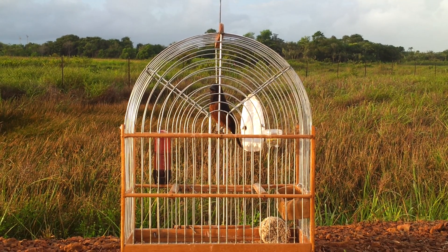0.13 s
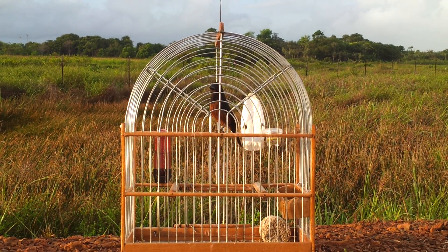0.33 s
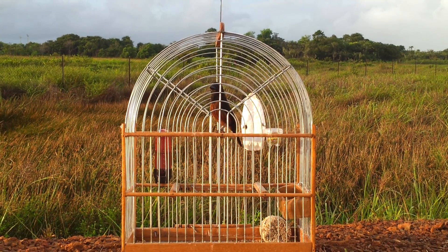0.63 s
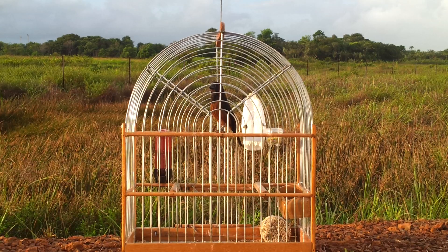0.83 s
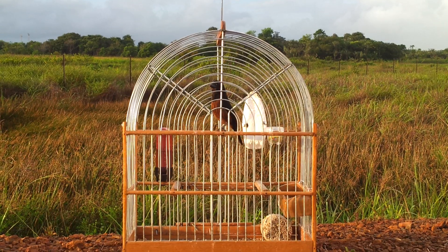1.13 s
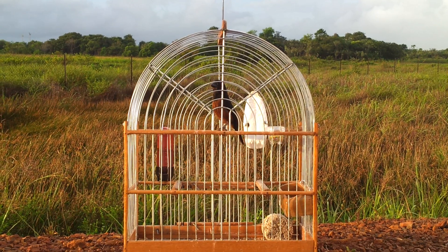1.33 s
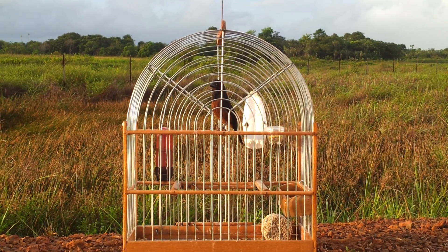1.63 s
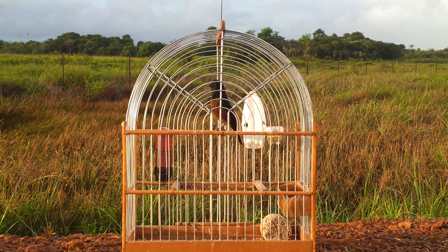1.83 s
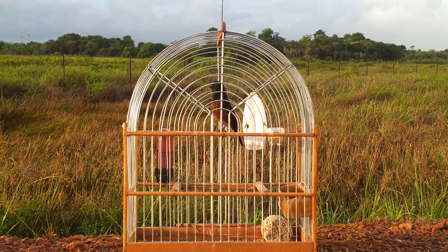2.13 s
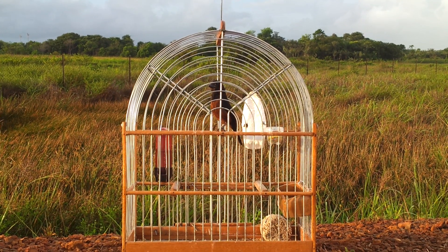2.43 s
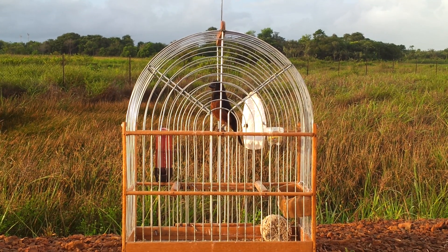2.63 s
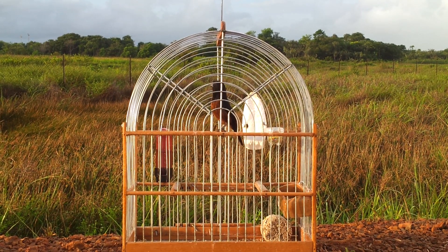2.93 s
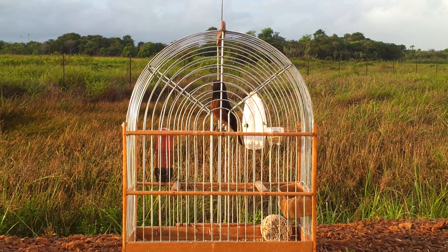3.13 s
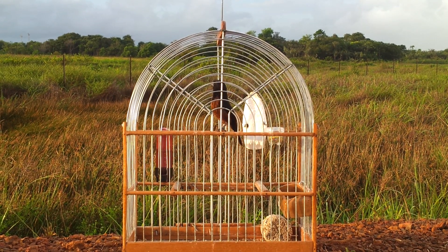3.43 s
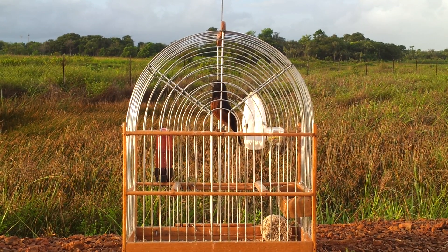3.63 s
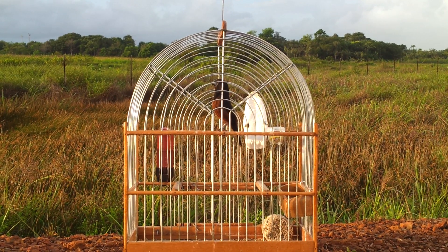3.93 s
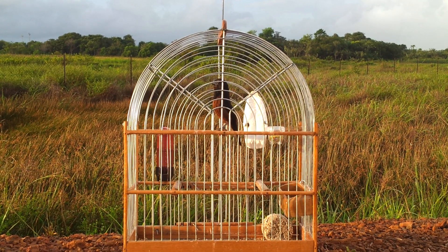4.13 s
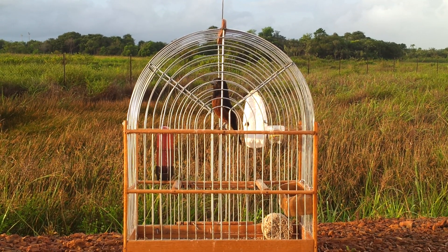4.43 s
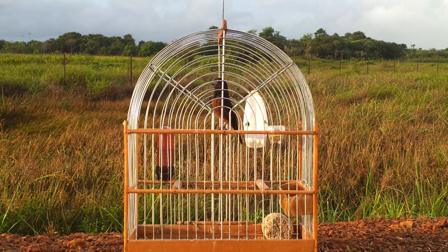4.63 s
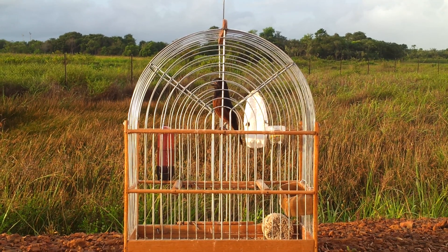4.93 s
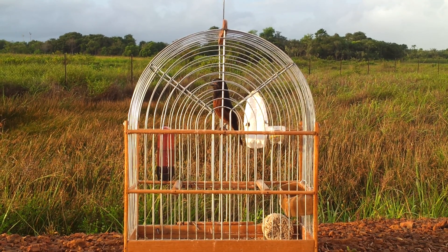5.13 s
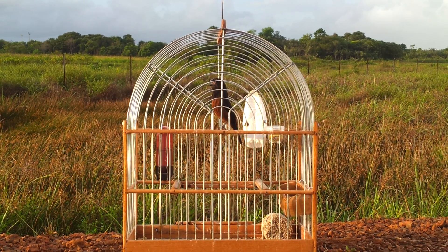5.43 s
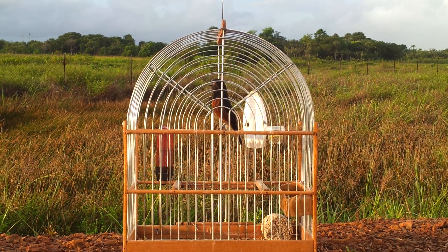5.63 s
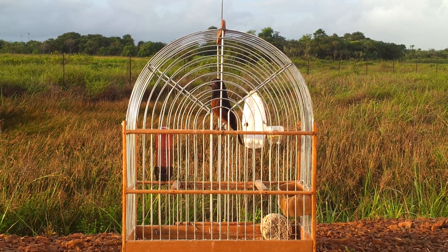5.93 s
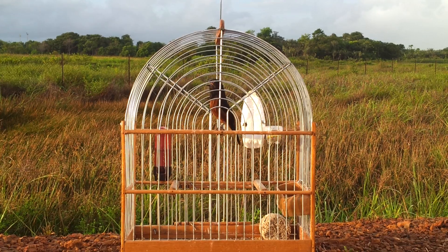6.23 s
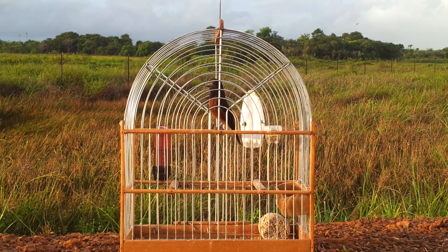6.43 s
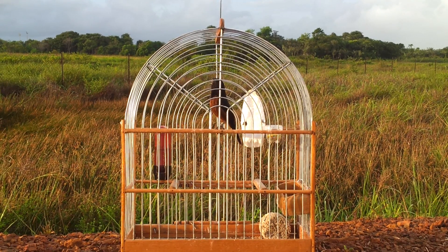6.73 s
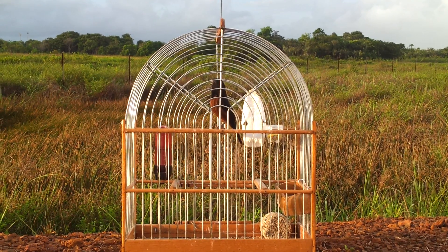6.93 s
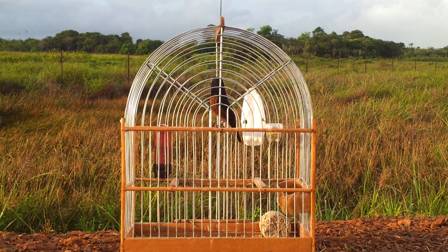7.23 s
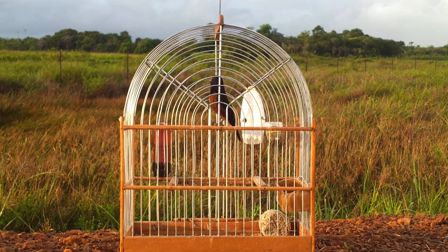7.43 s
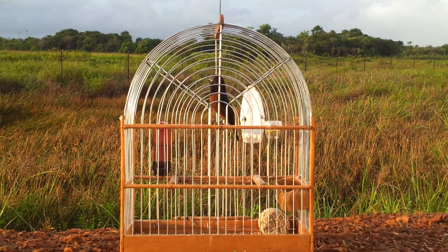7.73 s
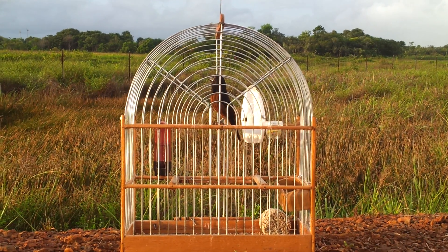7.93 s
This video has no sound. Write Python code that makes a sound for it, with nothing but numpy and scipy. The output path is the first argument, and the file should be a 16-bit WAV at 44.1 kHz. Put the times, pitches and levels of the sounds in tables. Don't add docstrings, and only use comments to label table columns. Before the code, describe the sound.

A small caged songbird, close and dry outdoors, with only slight reflections from cage and ground. First just quiet insects, faint land hum and tiny far chirps. Then bright, pure whistles bend up and down in quick phrases, swelling steadily; a fast rising trill and tight buzz lead to two sharp downward sweeps, the loudest moment, followed by a gentler trill and a few winding whistles.

```python
import sys
import numpy as np
from scipy import signal
from scipy.fft import rfft, irfft, next_fast_len
from scipy.io import wavfile
from scipy.ndimage import uniform_filter1d

SR = 44100
rng = np.random.default_rng(int(sys.argv[2]) if len(sys.argv) > 2 else 0)


def volts_from_decibels(level):
    exponent = np.asarray(level, float) / 20
    return 10 ** exponent


def wav_out(sig):
    wavfile.write(sys.argv[1], SR, np.round(np.clip(np.atleast_2d(sig).T, -1, 1) * 32767).astype(np.int16))


N = 356769
T = np.arange(N) / SR


def walk(rate_hz):
    hold = int(SR / rate_hz)
    steps = np.repeat(rng.standard_normal(N // hold + 1), hold)
    return 1.3 * uniform_filter1d(uniform_filter1d(steps, hold), hold)[:N]


def band(x, hz, width_hz, order=2):
    edges = [hz - width_hz / 2, hz + width_hz / 2]
    return signal.sosfilt(signal.butter(order, edges, "band", fs=SR, output="sos"), x)


def level(x, db):
    return x * volts_from_decibels(db) / np.sqrt(np.mean(x ** 2))


def lookup(table, hz):
    table_hz, table_db = np.array(table).T
    return np.interp(np.log(hz), np.log(table_hz), table_db)


def echoes(x, delay_ms, gain):
    lead, taps = 16, np.arange(-16, 360)
    off = taps - np.array(delay_ms)[:, None] * SR / 1000
    window = np.cos(np.pi / 2 * np.clip(off / lead, -1, 1)) ** 2
    response = np.array(gain) @ (np.sinc(off) * window)
    return signal.oaconvolve(x, response)[lead:lead + N]


def slides(table, blunt, late, early, loose=1):
    out = np.zeros(N)
    for (s, length, first, middle, last, db), turn in zip(table, rng.random((len(table), 1))):
        u = np.arange(int(length * SR)) / (length * SR)
        bend = middle - (first + last) / 2
        hz = first + (last - first) * u + 4 * u * (1 - u) * bend
        swell = np.sin(np.pi * u ** (late if last > first else early)) ** blunt
        tone = np.sin(2 * np.pi * (np.cumsum(hz) / SR + loose * turn))
        out[int(s * SR):][:len(u)] += np.sqrt(2) * volts_from_decibels(db) * swell * tone
    return out


def straight(table):
    return [(s, length, first, (first + last) / 2, last, db) for s, length, first, last, db in table]


ECHO_MS = [
    [0, .363, 3.197, 4.036],
    [0, .159, .59, 1.315, 1.95, 3.832, 5.578, 7.506],
    [.136, 1.519, 2.041, 4.512],
]
ECHO_GAIN = [
    [0.93, -0.23, -0.13, 0.22],
    [0.25, 0.98, 0.28, -.36, 0.09, -0.21, -0.3, 0.12],
    [1, -0.43, -0.21, -0.18],
]


def finch():
    pair = trills()
    mixed = volts_from_decibels(-12.5) * band(pair ** 2, 6100, 3600)
    mixed = mixed + volts_from_decibels(17.5) * band(pair ** 3, 4880, 1300)
    pair = pair + buzz()
    song = whistles() + pair + mixed + smacks()
    song = song * (1 + volts_from_decibels(-29.5) * band(rng.standard_normal(N), 900, 1300, order=1))
    rasp = song * band(rng.standard_normal(N), 950, 900)
    song = song + volts_from_decibels(-30) * band(rasp, 4150, 900)

    near = echoes(song, ECHO_MS[0], ECHO_GAIN[0])
    mics = np.array([echoes(near, ms, gain) for ms, gain in zip(ECHO_MS[1:], ECHO_GAIN[1:])])

    air = rng.standard_normal((2, 2, N))
    hiss = volts_from_decibels(-22.5) * uniform_filter1d(abs(pair), 200) * band(air[0], 7000, 9000, order=5)
    shrill = abs(band(pair, 7100, 2400, order=4))
    hiss = hiss + volts_from_decibels(-10) * uniform_filter1d(shrill, 900) * band(air[1], 10000, 8500)
    hiss = hiss + volts_from_decibels(-33) * uniform_filter1d(abs(song), 2000) * band(air[1], 500, 700)

    t = T[:SR // 4]
    tail = rng.standard_normal((2, len(t))) * np.exp(-np.log(1000) * t / 0.26) * (t > .008)
    return mics + hiss + volts_from_decibels(-62) * signal.fftconvolve(song[None], tail, axes=1)[:, :N]


# t/s from start, f/Hz, level/dB under the loudest moment
OPENER = [(0, 4400, -19), (.012, 4050, -15), (.052, 3980, -14), (.08, 3290, -20), (.104, 3310, -12),
          (.144, 3620, 0), (.161, 3880, -11), (.174, 3230, -24), (.217, 3200, -28)]
ZIGZAG = [(0, 4090, -22.5), (.039, 3790, -20.5), (.056, 3693, 0), (.111, 3020, -20.5), (.127, 3780, -16.5),
          (.164, 3860, -21), (.176, 3716, -4), (.207, 3130, -14), (.217, 3220, -35)]
HOOK = [(0, 2100, -20), (.012, 1890, -17), (.033, 1670, -9), (.043, 1710, -11), (.054, 1920, -11),
        (.064, 2100, -5), (.093, 2140, -2), (.108, 1970, -13), (.119, 1220, -24)]
DIP = [(0, 3800, -26), (.032, 3790, -6.5), (.06, 3670, -2.2), (.095, 3380, -2.5), (.116, 3146, 0),
       (.138, 2720, -14), (.163, 2790, -15), (.185, 3220, -9), (.204, 3280, -2.8)]
WAVE = [(0, 3950, -24), (.024, 3810, -14), (.036, 3770, -3), (.052, 3720, -1.5), (.066, 3600, -10),
        (.082, 3340, -14), (.098, 3840, -12), (.122, 3720, -1.5)]
STAIR = [(0, 3990, -23), (.013, 4075, -6), (.03, 4325, -3), (.039, 3900, -14), (.058, 3090, -19.5),
         (.086, 3045, -11), (.112, 3140, -3), (.154, 3118, 0), (.164, 2930, -11)]
BUMP = [(0, 1300, -6), (.006, 1680, -7), (.011, 1933, -3), (.017, 1830, 0), (.021, 1520, -6),
        (.03, 1220, -12)]
GULP = [(0, 1300, -16), (.014, 1520, 0), (.022, 1470, -8), (.035, 1270, -14)]
PICKUP = [(0, 1500, -6), (.006, 1850, 0), (.027, 2040, -4)]
LIFT = [(0, 4450, -4), (.01, 4520, 0), (.024, 4680, -3), (.039, 5200, -5), (.046, 6300, -25)]
CATCH = [(0, 3790, -16), (.019, 3753, -2.2), (.036, 3693, 0), (.04, 3750, -24), (.047, 4484, -8.5),
         (.055, 3430, -16)]
SINK = [(0, 3667, -26.5), (.013, 3666, -8.5), (.038, 3555, 0), (.061, 3304, -4.5), (.074, 3186, -12.5),
        (.08, 3100, -23.5), (.089, 3083, -5), (.124, 2784, -6.5), (.145, 2560, -27)]
SOFT_HOOK = [(0, 2150, -9), (.012, 1980, -6), (.034, 1640, -6), (.046, 1740, -12), (.057, 2090, -6),
             (.095, 2135, -2), (.106, 2110, 0), (.113, 1800, -6), (.121, 1250, -19)]
LATE_STAIR = [(0, 3990, -20), (.012, 4075, -6), (.028, 4325, -2), (.039, 3900, -14), (.062, 3050, -20),
              (.086, 3045, -11), (.112, 3140, -3), (.158, 3118, -1), (.172, 2930, -9)]
FIRST = [(0, 4450, -24), (.009, 4180, -15), (.038, 4260, -17), (.075, 3420, -22), (.105, 3330, -12),
         (.145, 3760, -2), (.151, 3980, -10), (.16, 3360, -19), (.205, 3310, -19)]
LATE_DIP = [(0, 3680, -33), (.026, 3700, -19), (.054, 3750, -4), (.072, 3620, -3), (.118, 3210, 0),
            (.14, 2760, -11), (.16, 2650, -16), (.19, 3190, -12), (.212, 3280, -2)]
LATE_WAVE = [(0, 3900, -32), (.013, 3810, -14), (.034, 3750, -1), (.054, 3600, -2), (.07, 3400, -6),
             (.08, 3280, -8), (.086, 3450, -16), (.102, 3760, -3)]
# t/s from start, f/Hz, level/dB
FLICK = [(0, 3118, 0), (.003, 3260, 0), (.005, 3610, -9), (.009, 4000, -11), (.017, 3900, -32)]
DROOP = [(0, 3167, -1.2), (.007, 3140, -9), (.016, 3000, 0), (.034, 2880, -1.5), (.045, 2730, -5),
         (.053, 2400, -20)]
FOOT = [(0, 2280, -11), (.012, 2240, -2.5), (.05, 2365, 0), (.056, 2170, 0), (.062, 1780, -12),
        (.069, 1320, -15)]
ARCH_UP = [(0, 1270, -17.5), (.007, 1447, -8), (.026, 1583, -10.5), (.088, 1868, -7), (.145, 2150, 0),
           (.158, 2265, -4), (.178, 2430, -2.2)]
ARCH_DOWN = [(0, 2410, -3), (.011, 2264, -4.5), (.019, 2133, 0), (.042, 1924, -16), (.055, 1848, -6.5),
             (.093, 1728, -16.5), (.099, 1564, -11), (.107, 1190, -25)]
PLUNGE = [(0, 6800, -35), (.006, 5650, -29), (.011, 5050, -13.5), (.022, 4460, -6), (.031, 4270, .6),
          (.049, 3835, -10), (.063, 3680, -5), (.073, 3680, -52)]
CLIMB = [(0, 3160, -33), (.026, 3090, -7), (.038, 3110, -22), (.054, 3280, -13), (.067, 3452, -.4),
         (.083, 3680, -1.2), (.092, 3800, -24)]
# t/s, f/Hz, level/dB each
TIED = [FLICK, DROOP, FOOT, ARCH_UP, ARCH_DOWN, PLUNGE, CLIMB]
# gesture, t/s, time stretch/ratio, pitch factor/ratio, level/dB
VERSE = [(FIRST, 2.922, 1, 1, -32.5), (OPENER, 3.232, 1, 1, -24.5), (ZIGZAG, 3.54, 1, 1, -20),
         (SOFT_HOOK, 3.85, 1, 1, -28), (DIP, 4.016, 1, 1, -19), (FLICK, 4.287, .85, .98, -20.5),
         (WAVE, 4.381, 1, 1, -16.5), (FLICK, 4.601, 1.1, 1.01, -18), (STAIR, 4.698, .99, 1, -13),
         (FOOT, 4.885, 1, .99, -20.5), (LATE_STAIR, 5.02, 1, 1, -13), (FOOT, 5.21, 1.03, 1.005, -17),
         (BUMP, 5.343, 1, 1, -20), (ARCH_UP, 5.379, 1, 1, -17.5), (ARCH_DOWN, 5.566, 1, 1, -14)]
FINALE = [(GULP, 6.011, 1, 1, -25), (PICKUP, 6.375, 1, 1, -30), (BUMP, 6.401, .67, 1.81, -23),
          (LIFT, 6.427, 1, .99, -18.5), (PLUNGE, 6.474, 1.02, 1, -4), (LIFT, 6.584, .8, 1.04, -21),
          (PLUNGE, 6.622, .97, 1.003, -4), (CATCH, 6.972, 1, 1, -17), (CLIMB, 7.042, 1, 1, -9),
          (SINK, 7.188, 1, 1, -8.5), (HOOK, 7.42, 1, 1, -15.5), (LATE_DIP, 7.578, 1, 1, -10.3),
          (DROOP, 7.813, 1, 1, -16), (LATE_WAVE, 7.988, 1, 1, -18)]


def notes():
    out = []
    for shape, start, stretch, tune, db in VERSE + FINALE:
        rows = [(start + s * stretch, hz * tune, under_db + db) for s, hz, under_db in shape]
        if shape in TIED:
            out[-1] = out[-1] + rows
        else:
            out.append(rows)
    return out


# f/Hz, level/dB
THROAT = [(1200, -9), (2000, -1), (3200, -0.9), (4900, 4), (6000, -4.5), (7600, -2.3), (9500, -3.5),
          (11500, 7), (15000, -5.5)]
CHEST_DB = [-17.5, -0.4, -24, -35, -37, -48]
HEAD_DB = [3, -28, -35.5, -49.5, -68.5, -76.5]
# from f/Hz, to f/Hz
BREAK_HZ = (2350, 2750)
# boost of harmonics 3 and 4, level/dB
PRESS_DB = [
    [13],
    [27],
]


def whistles():
    out = np.zeros(N)
    for note in notes():
        s, hz, db = np.transpose(note)
        on = slice(int(s.min() * SR), min(int(s.max() * SR), N))
        t = T[on]
        hz = uniform_filter1d(np.interp(t, s, hz), 90)
        rich_db = 9 * np.clip(np.log2(2000 / hz), 0, 1)
        gains = []
        for k, pair_db in enumerate(zip(CHEST_DB, HEAD_DB), start=1):
            voice_db = np.interp(hz, BREAK_HZ, pair_db) + min(max(k - 2, 0), 2) * rich_db
            gains.append(volts_from_decibels(voice_db + lookup(THROAT, k * hz)))
        gains = np.array(gains)
        press_s = 6.025
        gains[2:4] *= volts_from_decibels(np.array(PRESS_DB) * (abs(t - press_s) < .03))
        gains[0] *= volts_from_decibels(1.4 * np.clip(-19.5 - db.max(), 0, 10) * (hz > 1550) * (hz < 2300))
        gains = gains / np.sqrt(np.sum(gains ** 2, axis=0))

        phase = 2 * np.pi * np.cumsum(hz) / SR
        tone = sum(g * (k * hz < .45 * SR) * np.sin(k * phase) for k, g in enumerate(gains, start=1))
        edge = np.clip(np.minimum(t - t[0], t[-1] - t) / 0.00052, 0, 1)
        loudness = volts_from_decibels(uniform_filter1d(np.interp(t, s, db), 90))
        out[on] += np.sqrt(2) * loudness * edge * tone
    return out


# t/s, length/s, first f/Hz, last f/Hz, level/dB
LOUD_TRILL = [(5.745, .021, 3600, 4400, -22), (5.759, .028, 3400, 4350, -15),
              (5.775, .041, 3150, 4300, -13), (5.8, .044, 3000, 4200, -13), (5.825, .051, 2950, 3980, -14),
              (5.857, .047, 2950, 3850, -15), (5.883, .047, 2950, 3700, -14)]
SOFT_TRILL = [(6.732, .027, 3500, 4200, -22), (6.749, .03, 3200, 4050, -18), (6.765, .037, 2900, 3950, -13),
              (6.787, .035, 2850, 3900, -18), (6.811, .041, 2850, 3760, -16),
              (6.836, .044, 2800, 3770, -16.5), (6.862, .04, 2850, 3450, -21)]
# t/s, length/s, first f/Hz, middle f/Hz, level/dB
RATTLE = [
    (6.174, .024, 4530, 3976, -9.5),
    (6.197, .03, 4460, 3674, -10.5),
    (6.221, .038, 4940, 3510, -13),
    (6.248, .039, 4695, 3380, -15.5),
    (6.276, .024, 4600, 3950, -24),
    (6.189, .014, 7600, 7000, -42),
]
# delay t/s, length/s, first f/Hz, middle f/Hz, last f/Hz, level/dB under the stair
SWOOP = (.025, .058, 6360, 4230, 3575, -15)
# t/s, length/s, first f/Hz, last f/Hz, level/dB
GRACES = [(5.738, .0072, 4900, 4280, -34), (5.918, .014, 3000, 2600, -27), (6.032, .016, 6500, 5900, -33),
          (6.05, .013, 6650, 6950, -25), (6.212, .019, 7350, 5850, -48), (6.89, .012, 2790, 2620, -29),
          (6.045, .016, 4200, 2800, -44), (6.377, .01, 3500, 5200, -33), (6.73, .006, 5000, 3700, -38),
          (5.018, .004, 4900, 4000, -38), (7.577, .004, 4700, 3800, -42), (7.987, .005, 4800, 3900, -42),
          (5.346, .008, 3400, 5200, -32), (5.361, .012, 5000, 3800, -34), (5.268, .012, 5300, 4300, -34)]
# t/s, half width/s, share shut/0-1
SHUTS = [(5.764, .002, .7), (5.789, .002, .4), (5.818, .002, .5), (5.851, .002, .3), (5.881, .002, .4),
         (5.898, .0015, .4), (6.762, .002, .3), (6.778, .002, .5), (6.801, .002, .8), (6.8235, .0022, .95),
         (6.852, .002, .95), (6.8795, .0025, 1)]


def trills():
    rising = []
    for table, bend in ((LOUD_TRILL, .1), (SOFT_TRILL, .19)):
        for s, length, first, last, db in table:
            middle = (first + last) / 2 + bend * (last - first)
            rising.append((s, length, first, middle, last, db))
    falling = [(s, length, first, middle, .77 * middle, db) for s, length, first, middle, db in RATTLE]
    delay, *path, under_db = SWOOP
    swoops = [(start + delay, *path, db + under_db)
              for shape, start, _, _, db in VERSE if shape in (STAIR, LATE_STAIR)]
    pipe = np.ones(N)
    for s, half, shut in SHUTS:
        pipe *= 1 - np.clip(shut, 0, 1) * np.exp(-((T - s) / half) ** 2)
    cut = pipe * slides(rising, blunt=.8, late=1.6, early=.7)
    return cut + slides(falling + swoops + straight(GRACES), blunt=.8, late=1.4, early=.7)


LOW_DB = [-36, -34, -32, -28, -26, -23, -19]
HIGH_DB = [-23, -23, -19, -22, -23, -28, -28]
# delay t/s, length/s, first f/Hz, middle f/Hz, last f/Hz
LOW_PATH = (.001, .021, 4400, 3500, 2500)
HIGH_PATH = (.004, .017, 8400, 6950, 5500)


def buzz():
    start_s, gap_s, drag_s = 6.0605, 678 / SR, .0012
    k = np.arange(len(LOW_DB))
    starts = start_s + gap_s * k + drag_s * np.maximum(k - 4, 0)
    low = [(s + LOW_PATH[0], *LOW_PATH[1:], db) for s, db in zip(starts, LOW_DB)]
    high = [(s + HIGH_PATH[0], *HIGH_PATH[1:], db) for s, db in zip(starts, HIGH_DB)]
    hoarse = level(band(rng.standard_normal((2, N)), 700, 1100, order=1), 0)
    low_voice = (1 + volts_from_decibels(-11) * hoarse[0]) * slides(low, blunt=.8, late=1, early=.42)
    high_voice = (1 + volts_from_decibels(-14) * hoarse[1]) * slides(high, blunt=1.8, late=1, early=.85, loose=0)
    return low_voice + high_voice


# t/s, decay/s, centre f/Hz, level/dB, width/Hz
SMACKS = [(3.961, .003, 4600, -44, 3200), (4.942, .004, 4800, -40, 3000), (5.268, .004, 4800, -37, 3000),
          (5.346, .006, 4400, -41, 2500), (7.529, .004, 5600, -39, 3500), (5.92, .007, 4200, -39, 2500),
          (4.718, .012, 8000, -47, 8000), (5.042, .012, 8000, -46, 8000), (4.8, .016, 4200, -48, 1300),
          (5.12, .016, 4200, -47, 1300), (7.69, .02, 4200, -44, 1500), (7.785, .012, 4200, -48, 1200)]


def smacks():
    out, air = np.zeros(N), rng.standard_normal(N)
    for s, decay, hz, db, width in SMACKS:
        age = np.maximum(T - s, 0) / decay
        out += level(band(air, hz, width), db) * age * np.exp(1 - age)
    return out


# t/s, length/s, first f/Hz, last f/Hz, level/dB
FAINT_GLIDES = [(.53, .03, 6300, 5700, -60), (2.8, .03, 5900, 6300, -61), (3.765, .017, 4030, 4120, -55),
                (7.7, .067, 3660, 4310, -46), (4.165, .022, 4180, 4320, -54), (.21, .03, 3950, 3650, -60),
                (.66, .035, 6300, 5400, -59), (.68, .03, 3620, 3320, -57), (.985, .025, 5450, 5000, -56),
                (1.14, .015, 3490, 3480, -56), (1.23, .015, 3530, 3460, -55), (1.32, .015, 3470, 3480, -54),
                (1.45, .02, 3700, 3400, -56), (1.27, .25, 5470, 5610, -68), (2.0, .27, 5450, 5440, -69),
                (2.41, .02, 5400, 4400, -61), (1.26, .035, 6300, 5800, -61), (2.63, .04, 5670, 5610, -56),
                (2.65, .05, 5170, 4670, -63)]


def faint_glides():
    far = slides(straight(FAINT_GLIDES), blunt=.8, late=0.92, early=.9)
    return np.array([far, .8 * np.roll(far, 9)])


# f/Hz, width/Hz, level/dB, left minus right/dB
CICADAS = [
    (6964, 1280, -55.5, 1),
    (9160, 1360, -62.5, 1.2),
    (8030, 300, -72, -4.8),
    (5900, 1060, -69, 4.5),
    (11670, 4800, -68, -1),
]


def insects():
    out = 0
    for hz, width, db, pan_db in CICADAS:
        hiss = level(band(rng.standard_normal((2, N)), hz, width, order=3), db + 5)
        flicker_db = .4 * walk(.7) + 1.2 * walk(30)
        out = out + hiss * volts_from_decibels(flicker_db + np.array([[pan_db], [-pan_db]]) / 2)
    throb_hz = 35.0 + .3 * walk(1.5)
    throb = np.maximum(np.sin(2 * np.pi * np.cumsum(throb_hz) / SR), 0) ** 1.5
    note_hz = 6440 + 15 * walk(40)
    cricket = throb * volts_from_decibels(2.5 * walk(1.2)) * np.sin(2 * np.pi * np.cumsum(note_hz) / SR)
    return out + level(cricket, -64) * np.array([[1.1], [.9]])


# f/Hz, level/dB per Hz
LAND = [(18, -51), (30, -33), (102, -11.5), (139, -2.5), (177, -4.5), (206, -1), (563, -4), (601, -4.5),
        (952, -4), (1800, -9), (2330, -9), (4310, -13.5), (5600, -9.5), (7280, -38), (12300, -120)]
# f/Hz, left minus right/dB
LAND_PAN = [(100, 3), (500, 2.0), (2300, -0.3), (4300, 3.5)]


def land():
    out, swell = 0, walk(1.0)
    edges_hz = 30 * 2 ** np.arange(0, 7.6, .5)
    size = next_fast_len(N)
    hz = np.maximum(np.arange(size // 2 + 1) * SR / size, 1)
    wave, left, right = rfft(rng.standard_normal((3, size)))
    share = np.clip(1.1 - hz / 3500, 0, .5) * np.clip(hz / 150, .3, 1)
    early = np.exp(2j * np.pi * hz * .00036)
    both = np.array([np.sqrt(share) * wave * early + np.sqrt(1 - share) * left,
                     np.sqrt(share) * wave + np.sqrt(1 - share) * right])
    both = both * volts_from_decibels(lookup(LAND, hz) + np.outer([.5, -.5], lookup(LAND_PAN, hz)))
    for low, high in zip(edges_hz[:-1], edges_hz[1:]):
        part = irfft(both * ((hz >= low) & (hz < high)), size)[:, :N]
        out = out + volts_from_decibels(.5 * swell + 0.85 * walk(6)) * part
    return level(out, -54)


# low f/Hz, high f/Hz
DUCK_HZ = (4250, 5250)


def scene():
    bird, far, meadow = finch(), faint_glides(), insects() + land()
    strip = signal.sosfiltfilt(signal.butter(3, DUCK_HZ, "band", fs=SR, output="sos"), meadow)
    duck_db = -30
    duck = np.clip(uniform_filter1d(abs(bird[0]), 1200) / volts_from_decibels(duck_db), 0, 1)
    return bird + meadow - duck * strip + far


def band_limit(x):
    return signal.sosfilt(signal.butter(12, 15210, fs=SR, output="sos"), x)


# from t/s, to t/s; low f/Hz, high f/Hz
STARVE_S = (6.082, 6.183)
STARVE_HZ = (160, 2300)


def record(dry):
    rounded = dry - 0.033 * dry ** 3
    top_hz = 14750
    wet = signal.sosfiltfilt(signal.ellip(6, .1, 40, top_hz, fs=SR, output="sos"), rounded)
    lows = signal.sosfiltfilt(signal.butter(6, STARVE_HZ, "band", fs=SR, output="sos"), wet)
    gate = uniform_filter1d(1. * (T > STARVE_S[0]) * (T < STARVE_S[1]), 700)
    return band_limit(np.clip(wet - lows * gate, -1, 1))


dry = scene()
out = record(dry)
wav_out(out)
```